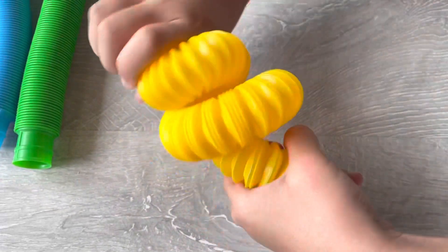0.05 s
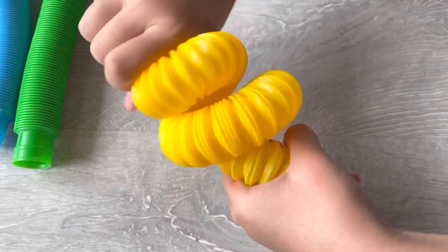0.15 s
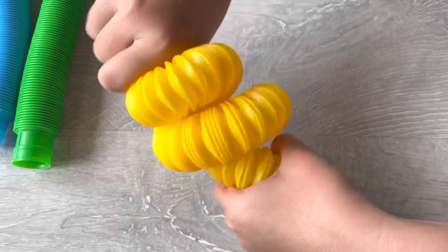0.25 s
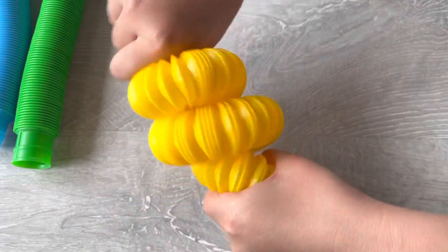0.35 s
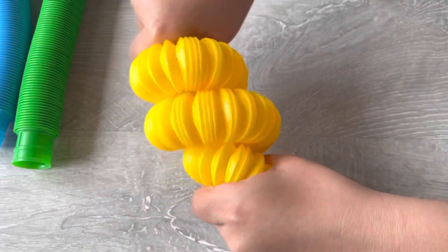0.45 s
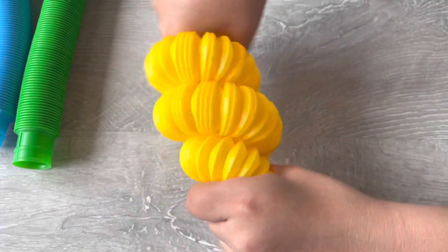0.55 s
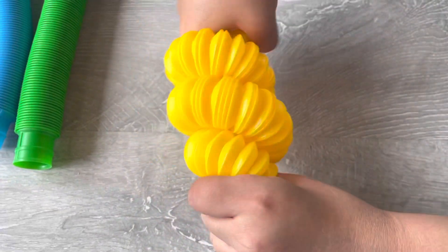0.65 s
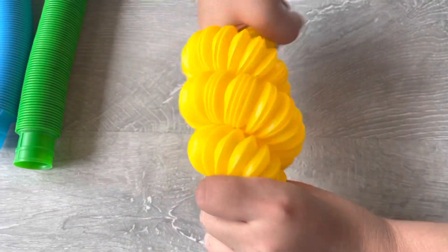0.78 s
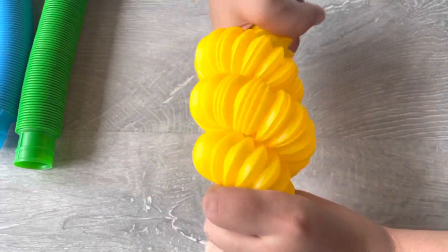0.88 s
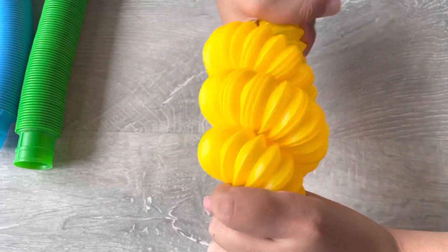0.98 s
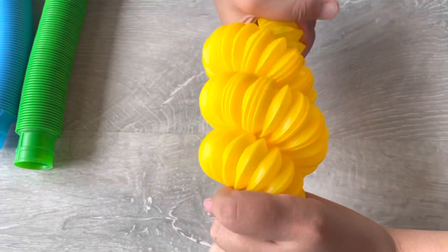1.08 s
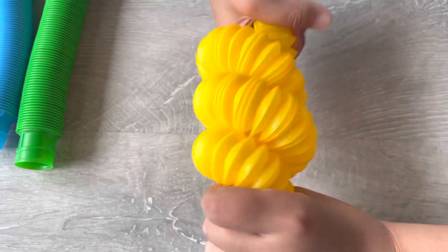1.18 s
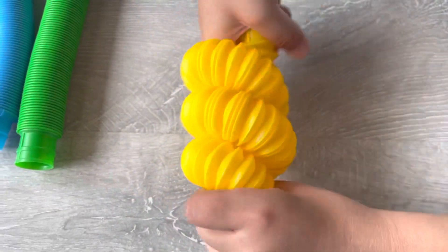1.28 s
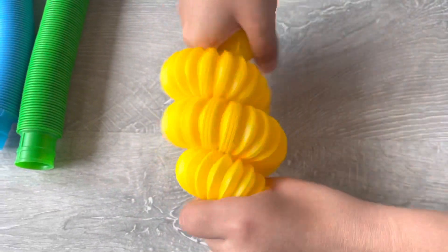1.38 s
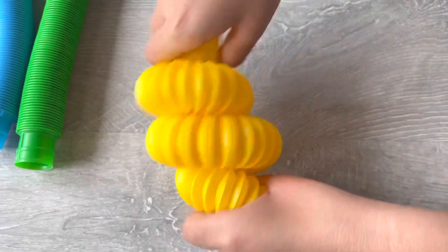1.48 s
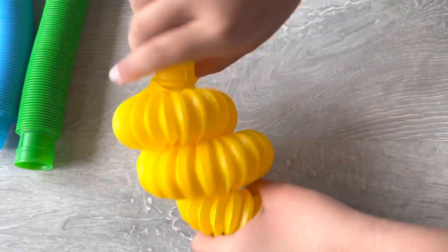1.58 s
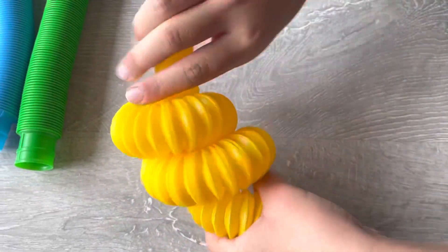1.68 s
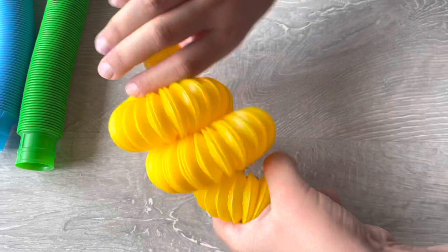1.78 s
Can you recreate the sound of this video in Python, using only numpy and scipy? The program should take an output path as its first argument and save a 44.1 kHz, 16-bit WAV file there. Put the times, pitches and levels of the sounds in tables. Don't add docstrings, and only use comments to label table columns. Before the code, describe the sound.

Close stereo phone pickup in a quiet room: plastic folds buckle with sharp cracks and short hollow ringing, skin rasps over ribs, the loudest snaps distort, then a pause and a smaller cluster of clicks as it springs back.

```python
import sys
import numpy as np
from scipy import signal
from scipy.fft import rfft, irfft, next_fast_len
from scipy.io import wavfile
from scipy.ndimage import uniform_filter1d

SR = 44100
rng = np.random.default_rng(int(sys.argv[2]) if len(sys.argv) > 2 else 0)


def transcribe(signal):
    frames = np.atleast_2d(signal).T
    limited = np.clip(frames, -1, 1)
    pcm = np.round(limited * 32767).astype(np.int16)
    wavfile.write(sys.argv[1], SR, pcm)


def ratio_of_db(decibels):
    return 10 ** (np.asarray(decibels, float) / 20)


N = 81585

# (time [s], crack [dB], low tones [dB], middle tone [dB], upper tones [dB])
SNAPS = [(0.0116, -41, -40, -32, -67), (0.0249, -51.5, -32, -22.5, -35), (0.139, -76, -91, -41, -95),
         (0.1759, -42, -44, -44.5, -64), (0.2182, -18.5, -18.5, -5.5, -38),
         (0.2616, -22.5, -26.5, -6.5, -17), (0.2781, -24.5, -22, -10.5, -18.5),
         (0.3241, -24.5, -22.5, -20, -21), (0.3307, -24.5, -44.5, -4.5, -28.5),
         (0.3659, -34.5, -22, -20.5, -36), (0.415, -35, -31.5, -30.5, -36),
         (0.4201, -49.5, -28.5, -25.5, -49), (0.4308, -23, -17, -13, -26),
         (0.4564, -19, -12, -8.5, -17.5), (0.4657, -16.5, -13, -12, -2.5),
         (0.5086, -3, -7, 1, 1), (0.5138, -24, -9, -14.5, -29), (0.5231, -12, -24, -3.5, -10.5),
          (0.5508, -32, -25, -25.5, -54.5), (0.5639, -17, -15.5, -9, -20), (0.5883, -13, -7.5, 1.5, -5.5),
          (0.615, -16.5, -7.5, 5, -2.5), (0.6313, -27, -19, -16.5, -18.5),
          (0.6832, -16, -17.5, -5.5, -17.5), (0.708, -27, -37.5, -30, -31), (0.7474, -16.5, -7, -1, -5.5),
          (0.7541, -19, -52, -18, -13.5), (0.7973, -20.5, -14.5, -8.5, -12), (0.8175, -16, -8, 1, -7.5),
          (0.912, -24.5, -41, -44, -4.5), (0.9132, -11.5, -5.5, -2.5, -1), (0.931, -14, -12, 6, -4.5),
          (0.9742, -17.5, -7.5, -2, -4.5),
         (1.2191, -30, -31, -25.5, -36), (1.259, -31.5, -22, -12.5, -40), (1.3255, -16, -16.5, -9.5, -17),
           (1.3288, -10, -20.5, -2.5, -20), (1.3429, -24, -23, -41, -19), (1.3687, -17, -19.5, -7, -26),
           (1.384, -34, -42, -29, -45), (1.393, -31, -24, -19, -40), (1.412, -42, -28, -31, -47),
           (1.403, -25, -33, -23.5, -44), (1.4225, -36, -43, -16, -46), (1.5764, -96.5, -46, -36, -75.5),
           (1.6461, -34, -38.5, -29, -40), (1.698, -45.5, -59.5, -32, -78.5)]
FOLDS = SNAPS
SIDES = np.array([[0.5], [-0.5]])


def evened(x):
    return x / np.sqrt(np.mean(x ** 2) + 1e-20)


def read(points, hz):
    f, value = np.transpose(points)
    return np.interp(np.log(hz + 1), np.log(f + 1), value)


def follow(points):
    return ratio_of_db(np.interp(np.arange(N) / SR, *np.transpose(points)))


def coloured(x, spectrum, ports=0):
    # (frequency [Hz], left ahead of right [rad])
    port_lead = [(0, 0), (1120, -0.6), (2930, 1.5), (4910, 0.1), (10300, 5.9), (11900, 6.5), (13000, 8.5),
                 (15700, 10.4), (16700, 10.5)]
    size = next_fast_len(x.shape[1] + 2048)
    hz = np.fft.rfftfreq(size, 1 / SR)
    lead = ports * read(port_lead, hz) * np.minimum(hz / 1000, 1)
    turn = np.exp(1j * lead * SIDES)
    return irfft(rfft(x, size) * turn * ratio_of_db(read(spectrum, hz)), size)[:, :x.shape[1]]


def pair(same, size):
    a, b = rng.standard_normal((2, size))
    return np.array([a, same * a + np.sqrt(1 - same ** 2) * b])


def add(mix, s, sound):
    part = mix[:, round(s * SR):][:, :sound.shape[1]]
    part += sound[:, :part.shape[1]]


def ring(tones, level_db, pitch):
    delay, rise = 0.558, 1.207
    chirp, chirp_cycles = 0.32, 0.81
    t, out = np.arange(6000) / SR, 0
    for hz, db, t60, pan_db, lead in tones:
        vary_hz, vary_db, sway = rng.standard_normal(3)
        hz = hz * pitch * (1 + 0.015 * vary_hz)
        cycles = np.maximum(t * hz - delay, 0)
        turns = cycles + chirp * chirp_cycles * (1 - np.exp(-cycles / chirp_cycles))
        onset = 1 - np.exp(-(cycles / rise) ** 2)
        decay = ratio_of_db(level_db + db + 0.6 * vary_db - 60 * cycles / hz / t60)
        pan = ratio_of_db(SIDES * (pan_db + 1.2 * sway))
        out = out + onset * decay * pan * np.sin(2 * np.pi * turns + SIDES * lead)
    return out


def floor():
    # (frequency [Hz], level [dB])
    air_colour = [(12, -57.5), (20, -14), (106, -11.5), (161, -16.5), (1000, -42.5), (3920, -39.5),
                  (7080, -58.5), (15600, -60.5), (17000, -94.5)]
    air = evened(coloured(pair(0.97, size=N), air_colour))
    hum_hz = 94
    band = signal.butter(1, [hum_hz - 4, hum_hz + 4], "band", fs=SR, output="sos")
    hum = evened(signal.sosfilt(band, rng.standard_normal(N)))
    return ratio_of_db(-54.5) * air + ratio_of_db(-58) * hum


def rubbing():
    # (time [s], level [dB])
    grip = [(0, -37), (0.051, -40), (.17, -41), (.35, -34.5), (.45, -26), (.55, -20), (.7, -24.5),
            (.95, -26.5), (1.05, -27.5), (1.191, -33), (1.361, -30.5), (1.371, -15.5), (1.418, -21),
            (1.442, -34.5), (1.549, -47.5), (1.73, -41.5), (1.77, -73)]
    # (frequency [Hz], level [dB])
    rub_colour = [(100, -29), (260, 5.5), (450, 1.5), (1100, -10), (2000, -21), (3200, -14.5),
                  (6000, -39.5), (16000, -29)]
    # (frequency [Hz], level [dB], decay t60 [s], left over right [dB], left ahead [rad])
    rib_tones = [(1060, -5, 0.014, 0, -1.7), (1400, -9.5, .05, 0, -0.45), (2102, -12.5, .04, -1, -1.1)]
    slips_per_s, grain_db = 6200, 1.5
    slip_now = rng.random(N) < slips_per_s / SR
    slips = ratio_of_db(grain_db * np.minimum(rng.exponential(1, N), 5)) * slip_now
    grain = signal.oaconvolve(slips, ratio_of_db(-60 * np.arange(600) / SR / 0.012))[:N]
    skin = evened(grain) * pair(0.95, size=N)
    ribs = signal.oaconvolve(skin[:1], ring(rib_tones, -36.5, 0.98), axes=1)[:, :N]
    return (coloured(skin, rub_colour, ports=1) + ribs) * follow(grip)


def sliding():
    # (time [s], level [dB])
    slide = [(0, -54.5), (.03, -50.5), (.06, -58.5), (.11, -49.5), (.16, -60.5), (.3, -56), (1.051, -68.5),
             (1.222, -51), (1.321, -54.5), (1.458, -53), (1.55, -65), (1.719, -58), (1.76, -62.5)]
    # (frequency [Hz], level [dB])
    slide_colour = [(1500, -32.5), (4000, -4), (11000, 6.5), (16000, -8)]
    return coloured(pair(0.63, size=N), slide_colour, ports=1) * follow(slide)


def cracks():
    # (time [s], crack [dB])
    ticks = [(0.2874, -36), (0.4065, -44), (0.4465, -39.5), (0.5437, -27.5), (0.6078, -24), (1.39, -30),
             (1.413, -37), (1.8444, -45.5)]
    # (frequency [Hz], level [dB])
    crack_colour = [(700, -40), (1500, -6), (3000, -3.5), (5500, -8.5), (9000, -0.5), (16000, -12.5)]
    out = np.zeros((2, N))
    u = np.arange(1000) / SR / 0.0013
    for s, crack_db, *_ in FOLDS + ticks:
        ragged_db = 3.5 * evened(uniform_filter1d(rng.standard_normal(len(u)), size=30))
        burst = u * np.exp(1 - u) * ratio_of_db(crack_db + 1 + ragged_db)
        add(out, s, burst * pair(0.98, size=len(u)))
    return coloured(out, crack_colour, ports=0.86)


def tube_tones():
    # (frequency [Hz], level [dB], decay t60 [s], left over right [dB], left ahead [rad])
    low_tones = [(243.9, 9, 0.05, 1, 0.045), (380.2, 3.5, 0.029, -1, .1)]
    middle_tones = [(519, 7, 0.02, 2.8, 0.62), (719.6, -9.5, 0.014, 0.71, -.3)]
    third_tone = [(1000, 3.85, 0.026, -0.27, -0.66)]
    upper_tones = [(1433, -8, 0.024, 0.29, 0.69), (1630, -15.5, 0.036, -1, -0.041),
                   (2090, -12.5, 0.02, -0.63, 0.00051), (2470, -11.5, 0.023, -1.6, 1.94),
                   (3234, -6.5, 0.012, -0.74, 2.09)]
    # (time [s], middle tone [Hz], third tone [Hz], third over middle [dB], middle left over right [dB])
    voices = [(0.02, 467, 1040, -29, 0.3), (0.218, 485, 1000, -31, 2.5), (0.261, 476, 1060, -13.5, -2),
              (0.278, 521, 1096, -11.5, -2), (0.324, 473, 974, -8, -23), (0.330, 510, 970, -18.5, -1.5),
              (0.366, 573, 1020, -10.5, 4), (0.431, 560, 980, -14, 3), (0.456, 507, 1020, -10, -4),
              (0.465, 602, 963, 5.5, 7), (0.509, 602, 1000, -2, 0), (0.523, 517, 1060, -4.5, 0),
              (0.564, 514, 1000, -16.5, 4.2), (0.588, 509, 920, -13, 1.2), (0.615, 547, 936, -6.5, 0),
              (0.683, 620, 924, -12, -2), (0.747, 550, 877, 0, 4), (0.797, 590, 912, -7, 2),
              (0.817, 565.5, 877, -4.5, 2), (0.913, 618, 818, -3, 2), (0.931, 538, 908, -9.5, -1),
              (0.974, 526, 910, -6.5, 0.3), (1.219, 506, 970, -8, 0.3), (1.26, 457, 940, -19, -1.5),
              (1.328, 481, 1000, -9, -4.7), (1.369, 414, 995, -17.5, -3), (1.4, 426, 1116, -5, 0.3),
              (1.424, 366, 1050, -27, -4), (1.647, 469, 1064, -17.5, 0.3)]
    # (time [s], low tone factor [ratio])
    squeeze = [(0, 1.05), (0.219, 1.103), (.5, 1.085), (.69, 1.04), (0.751, 1.032), (.92, 1.048),
               (0.998, 1.016), (1.299, 1.04), (1.85, 1.05)]
    out = np.zeros((2, N))
    for s, _, low_db, middle_db, upper_db in FOLDS:
        nearest = min(voices, key=lambda voice: abs(voice[0] - s))
        _, middle_hz, third_hz, third_db, pan_db = nearest
        low = ring(low_tones, low_db, np.interp(s, *np.transpose(squeeze)))
        middle = ring(middle_tones, middle_db, middle_hz / middle_tones[0][0]) * ratio_of_db(pan_db * SIDES)
        third = ring(third_tone, middle_db + third_db, third_hz / third_tone[0][0])
        upper = ring(upper_tones, upper_db, 0.94)
        add(out, s, low + middle - third - upper)
    return out


def panels():
    # (time [s], frequency [Hz], level [dB])
    pings = [(0.2204, 1460, -30), (0.4305, 1410, -25.5), (0.4561, 1406, -16), (0.4663, 1367, -5),
             (0.5091, 1240, -4), (0.5885, 2050, -10), (0.6832, 1360, -18), (0.8169, 2074, -15.5),
             (0.9128, 1400, -9.5), (0.9149, 2600, -10), (0.974, 1920, -16), (1.3282, 784.4, -12),
             (1.327, 1400, -15.5), (1.6464, 3210, -38.5)]
    out = np.zeros((2, N))
    for s, hz, db in pings:
        t60 = 49.4 / hz
        add(out, s, -ring([(hz, 0, t60, 0, -0.4)], db, 0.95))
    return out


def room(x):
    # (frequency [Hz], decay t60 [s])
    room_decay = [(120, 0.73), (400, 0.21), (1200, 0.67), (3500, 0.077), (9000, 0.21)]
    # (frequency [Hz], level [dB])
    room_level = [(150, -20), (260, -18.5), (600, -13), (1500, -19.5), (4000, -11), (10000, -17)]
    hz, t, z = signal.stft(pair(0.31, size=SR // 2), SR, nperseg=256)
    t60 = read(room_decay, hz)[:, None]
    fading = ratio_of_db(read(room_level, hz)[:, None] - 60 * t / t60)
    z = z * fading / np.sqrt(t60 * SR / 14.0)
    tail = signal.istft(z, SR, nperseg=256)[1]
    tail = tail * np.clip(np.arange(tail.shape[1]) / SR / 0.012, 0, 1)
    return signal.fftconvolve(x.mean(0)[None], tail, axes=1)[:, :N]


def scene():
    tube = rubbing() + sliding() + cracks() + tube_tones() + panels()
    return tube + room(tube) + floor()


def gate(x):
    # (from [Hz], to [Hz], threshold [dB])
    deaf_bands = [(6800, 8700, -80), (13200, 15100, -81), (15100, 17000, -86)]
    gate_db, gate_hz = -98, 6300
    hz, _, z = signal.stft(x, SR, nperseg=512)
    power = (abs(z) ** 2).mean(0)
    smooth = uniform_filter1d(uniform_filter1d(power, size=9, axis=0), size=3, axis=1)
    keep = np.clip((10 * np.log10(abs(smooth) + 1e-20) - gate_db) / 4, 0, 1)
    keep[hz < gate_hz] = 1
    for low_hz, high_hz, db in deaf_bands:
        band = (hz > low_hz) & (hz < high_hz)
        keep[band] *= 10 * np.log10(power[band].mean(0) + 1e-20) > db
    return signal.istft(z * keep, SR, nperseg=512)[1][:, :N]


def roll_off(x):
    return signal.sosfilt(signal.butter(12, 17140, fs=SR, output="sos"), x)


def record(dry):
    # (frequency [Hz], level [dB])
    mic_colour = [(5800, 1.11), (6900, -5.5), (8200, -6.5), (9500, -9.5), (12500, -12.5), (14000, -8),
                  (15600, 5), (16400, -20)]
    band_limit = signal.firwin(255, 16900, fs=SR)[None]
    x = signal.oaconvolve(coloured(dry, mic_colour), band_limit, "same")
    knee = 12
    x = x / (1 + abs(x) ** knee) ** (1 / knee)
    return roll_off(gate(x))


dry = scene()
out = record(dry)
transcribe(out)
```